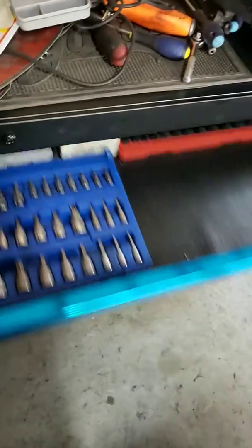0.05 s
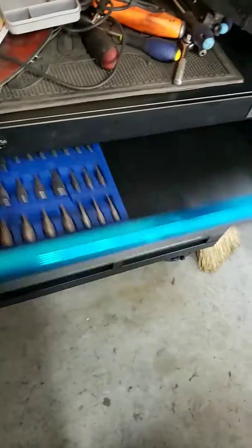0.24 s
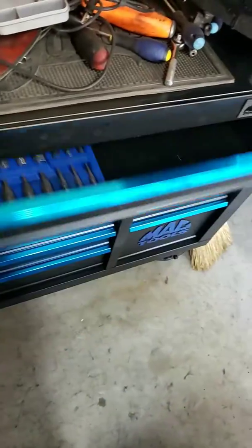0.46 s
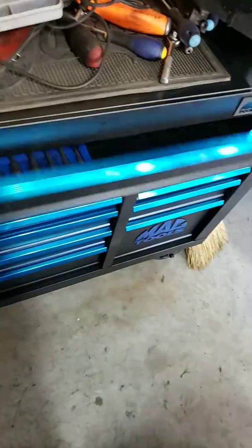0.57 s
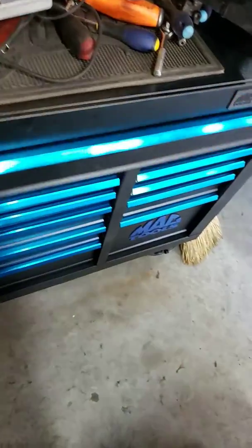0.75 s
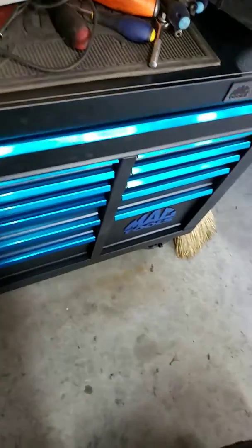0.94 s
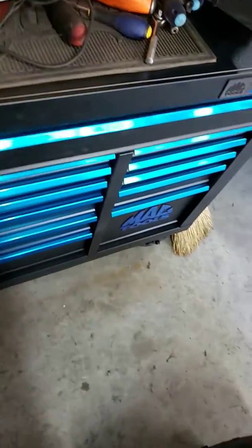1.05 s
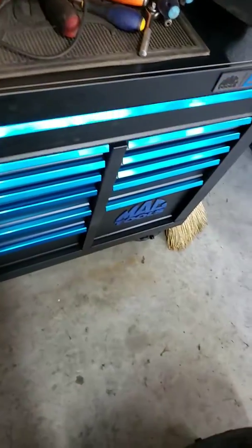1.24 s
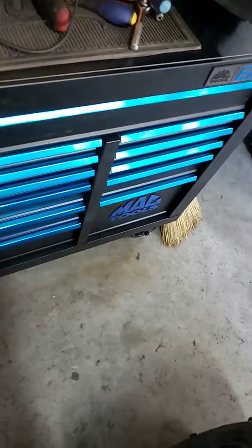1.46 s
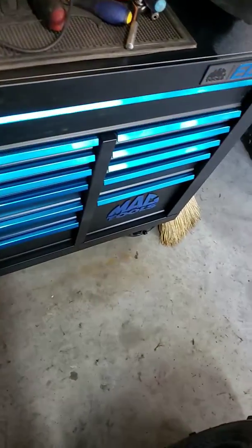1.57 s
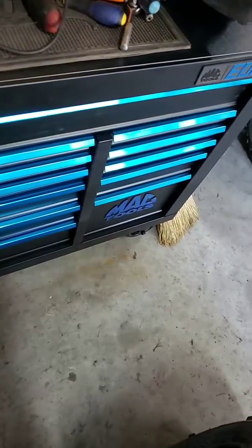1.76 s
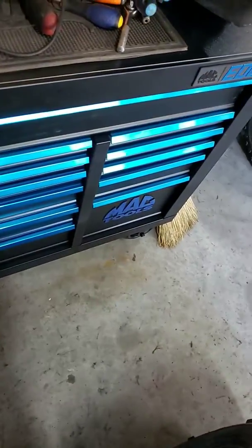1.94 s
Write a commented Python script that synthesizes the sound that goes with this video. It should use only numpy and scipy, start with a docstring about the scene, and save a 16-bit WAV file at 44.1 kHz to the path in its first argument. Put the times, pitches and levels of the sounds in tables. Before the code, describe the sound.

In a quiet workshop, a metal tool drawer slides closed with a soft rolling sound and a few clicks. A thump and hollow latch knock follow, while small steel bits clack and ring thinly over low room rumble.

```python
"""A steel tool chest drawer is pushed shut in a quiet workshop, heard on a stereo pair of microphones.
Its ball slides roll and knock twice; the soft-close catch takes it with a rattle and a thump, a side
panel hums briefly, the latch knocks and the damper draws it home with a whirr. Loose bits in the drawer
clack together and ring very high. A distant tap and a faint tick follow over the room's rumble."""
import sys
import numpy as np
from scipy import signal
from scipy.fft import rfft, irfft, next_fast_len
from scipy.io import wavfile

SR = 44100
rng = np.random.default_rng(int(sys.argv[2]) if len(sys.argv) > 2 else 0)


def wrap_up_sound(samples):
    """Save the sound to the file named by the first command line argument, as 16-bit audio."""
    columns = np.atleast_2d(samples).T
    # keep every value between -1 and 1, then stretch to whole-number steps
    tamed = np.clip(columns, -1, 1)
    steps = np.round(tamed * 32767).astype(np.int16)
    wavfile.write(sys.argv[1], SR, steps)


N = 88420
TIME = np.arange(N) / SR
HIT_TIME = TIME[:SR // 2]
CUTOFF_HZ = 15800

# The drawer's travel. Each row: time in seconds, rumble level in dB, hiss level in dB.
ROLL_LEVELS = [(0, -61.5, -68), (.11, -57, -64.5), (.28, -54.5, -60.5), (.39, -54.5, -70),
               (0.451, -54, -63), (.6, -57, -60.5), (0.678, -40.5, -54), (.82, -57, -62.5),
               (.92, -56.5, -56.5), (1.1, -59.5, -62.5), (1.23, -63.5, -70.5), (1.32, -70.5, -83.5),
               (1.42, -69, -80), (1.501, -79, -95), (1.8, -82.5, -99), (2, -71.5, -77.5)]
# Spectra of the slides. Each row: frequency in Hz, level in dB.
ROLL_RUMBLE = [(40, -14.5), (62, 5.5), (100, -2), (150, 0), (220, -6.5), (400, -3.5), (700, -8),
               (1100, -13.5), (2200, -42.5)]
ROLL_HISS = [(500, 2), (1000, -41), (1600, 0.5), (3000, 0), (4500, -1.5), (7000, -4.5), (8600, -22),
             (12000, -23), (15500, -15)]

def slides(clicks_per_s=230, grain_s=0.0048, grain_share=0.31):
    """Balls roll in their tracks: a rumble, and a hiss made grainy by their tiny clicks."""
    s, rumble_db, hiss_db = np.transpose(ROLL_LEVELS)
    clicks = (rng.random(N) < clicks_per_s / SR) * rng.exponential(1, N)
    grains = signal.lfilter([1], [1, -np.exp(-1 / (grain_s * SR))], clicks + 1e-18)
    flicker = np.sqrt(1 - grain_share + grain_share * grains / grains.mean())
    rumble = from_db(np.interp(TIME, s, rumble_db)) * noise(ROLL_RUMBLE)
    hiss = from_db(np.interp(TIME, s, hiss_db)) * flicker * noise(ROLL_HISS)
    return rumble + hiss

# Blows on the drawer. Each row: start in seconds, level in dB, tilt in dB per octave,
# t60 in seconds, favoured frequency in Hz, relative panel ring in dB.
KNOCKS = [(0.1193, -35.5, 2, 0.11, 715, -9), (.125, -34.5, -2, 0.079, 3260, -7),
          (.141, -46, 1.5, 0.29, 670, -20), (0.2067, -32.5, -0.2, 0.079, 1860, -13),
          (.221, -43.5, -0.5, 0.21, 706, -5), (.504, -49.5, 3, 0.18, 4900, -18),
          (0.625, -41.5, 0.6, 0.087, 1600, -7), (.638, -43, -1, 0.23, 1210, -19),
          (0.652, -45.5, 4.5, 0.072, 298, -5), (.659, -39, 4, 0.11, 1830, -10),
          (.691, -40.5, 4, 0.085, 400, -11), (.718, -45.5, 0, .062, 3530, -26),
          (.751, -36.5, 5, 0.044, 2980, -22.5), (0.854, -37.5, -0.5, 0.051, 2460, -20),
          (1.012, -44, -1.1, 0.11, 620, -4)]
# Struck steel. Each row: frequency in Hz, level in dB.
STEEL_SPECTRUM = [(60, 0), (200, -4.5), (400, -1), (720, 1), (950, -2), (1250, -2), (1650, -3),
                  (2100, -4.5), (2700, -7), (3300, -6.5), (4800, -13.5), (6700, -16.5), (8600, -30.5),
                  (12000, -22.5), (15500, -33)]
# The drawer's panel. Each row: frequency in Hz, level in dB, t60 in seconds.
PANEL_MODES = [(428, -5, .15), (573, -9, .14), (662, -3, .13), (712, 0, .17), (902, -4, .18),
               (1187, -2, .15), (1353, -8, .15), (1600, -7, .22), (1800, -5, .15), (2060, -4, .15),
               (2525, -7, .15), (3311, -6, .17), (3950, -15, .25)]

def knocks(out):
    """Steel knocks set the panel ringing; each place struck favours one band."""
    for s, db, tilt_db, t60, centre_hz, ring_db in KNOCKS:
        panel = from_db(ring_db - 4) * ring(favoured(PANEL_MODES, centre_hz), 0.001, scatter_db=3.5)
        spectrum = favoured(STEEL_SPECTRUM, centre_hz)
        steel = burst(spectrum, t60, tail_db=-14.5, attack_s=0.00052, tilt_db=tilt_db)
        add(out, s, from_db(db) * (steel + panel))

# Snaps in the tracks. Each row: start in seconds, level in dB.
SNAPS = [(0.088, -48), (.117, -39), (0.4285, -28.5)]
# Their spectrum. Each row: frequency in Hz, level in dB.
SNAP_SPECTRUM = [(1000, 6), (7000, -13), (9000, -2.5), (11500, -3), (13000, 11), (15500, 4)]

def snaps(out):
    """The slides give sharp, high snaps."""
    for s, db in SNAPS:
        add(out, s, from_db(db) * burst(SNAP_SPECTRUM, t60=0.0038, tail_db=-31.5, attack_s=0.00034))

# Thumps of the catch. Each row: start in seconds, level in dB, tilt in dB per octave.
THUMPS = [(.648, -35.5, 5), (0.662, -44.5, -5.5), (.683, -42, -8.5), (0.826, -49.5, -6)]
# The cabinet's body. Each row: frequency in Hz, level in dB, t60 in seconds.
CABINET_MODES = [(61.4, 0, 0.13), (149.7, 1.5, 0.13), (175.5, -8.5, 0.27), (246, -8.5, 0.16),
                 (310.5, -9, 0.32)]

def catch(out):
    """The catch loads the cabinet, which thumps in its low modes."""
    for s, db, tilt_db in THUMPS:
        modes = [(hz, mode_db + tilt_db * np.log2(hz / 150), t60) for hz, mode_db, t60 in CABINET_MODES]
        add(out, s, from_db(db) * ring(modes, attack_s=0.0019, scatter_db=2.5))

# Knocks of the latch. Each row: start in seconds, level in dB.
LATCH_HITS = [(0.8562, -33), (0.8653, -29)]
# Its modes. Each row: frequency in Hz, level in dB, t60 in seconds.
LATCH_MODES = [(388, -7, .05), (438, -1.5, .064), (684, -9, .09)]

def latch_knock(out):
    """The latch engages with a hollow double knock."""
    for s, db in LATCH_HITS:
        add(out, s, from_db(db) * ring(LATCH_MODES, attack_s=0.0011, scatter_db=1))

# Hum at the cabinet's side. Each row: time in seconds, level in dB.
HUM_LEVEL = [(.72, -88), (.738, -42), (.78, -48), (.805, -68), (.835, -47), (.87, -68), (.905, -62),
             (1.05, -110)]

def panel_hum(pitch_hz=149, waver_hz=5, wavers_per_s=25):
    """A side panel hums briefly after the catch, at a slightly unsteady pitch."""
    knots = np.arange(0, TIME[-1] + 1, 1 / wavers_per_s)
    hz = pitch_hz + waver_hz * np.interp(TIME, knots, rng.standard_normal(len(knots)))
    return sides(pitch_hz) * level(HUM_LEVEL) * np.sin(2 * np.pi * np.cumsum(hz) / SR)

# The damper's pull. Each row: time in seconds, level in dB.
WHIRR_LEVEL = [(.85, -65), (1.05, -57.5), (1.22, -62.5), (1.32, -73.5), (1.43, -81.5), (1.5, -94.5)]
# Its spectrum. Each row: frequency in Hz, level in dB.
WHIRR_SPECTRUM = [(700, -19.5), (1100, -7.5), (1450, 4.5), (1560, -6), (1700, 3.5), (1900, -10.5),
                  (2300, -3.5), (2950, -1), (3500, -25.5), (6000, -15.5), (8000, -46)]

def damper_whirr():
    """A faint whirr swells as the damper draws the drawer home."""
    return level(WHIRR_LEVEL) * noise(WHIRR_SPECTRUM)

# Inside the drawer. Each row: start in seconds, level in dB, favoured frequency in Hz, splash in dB.
CLACKS = [(.638, -44.5, 5070, -49), (.691, -39.5, 6400, -35), (0.7495, -42.5, 5300, -39),
          (.922, -46, 4000, -47), (0.932, -43, 5800, -41), (0.9418, -39, 4460, -40),
          (.956, -37, 4700, -44.5), (0.9637, -49.5, 4340, -70), (0.987, -39, 6340, -69),
          (1.0165, -40.5, 6000, -75), (1.108, -53.5, 5500, -82)]
# Spectra of a clack and its very high splash. Each row: frequency in Hz, level in dB.
CLACK_SPECTRUM = [(1000, -25), (2400, -15), (3000, -1), (3400, -16), (3900, 1), (4400, -6.5), (4820, 0),
                  (5400, -6), (6000, -3), (7200, -7), (8400, -32), (11000, -19), (15500, -29)]
SPLASH_SPECTRUM = [(3000, -20), (8400, -24), (11000, -9.5), (13500, 12), (15500, -18)]
# The tray under the bits. Each row: frequency in Hz, level in dB, t60 in seconds.
TRAY_MODES = [(3020, -28, 0.16), (3885, -13.5, 0.16), (4790, -3, 0.086), (5900, 2.5, 0.034),
              (7600, -7, 0.06)]

def bit_clacks(out, t60=0.04, tail_db=-19.5, attack_s=0.00058):
    """Loose steel bits strike each other and set their tray ringing."""
    for s, db, centre_hz, splash_db in CLACKS:
        tray = from_db(-9) * ring(favoured(TRAY_MODES, centre_hz), attack_s, scatter_db=4)
        clack = burst(favoured(CLACK_SPECTRUM, centre_hz), t60, tail_db, attack_s)
        add(out, s, from_db(db) * (clack + tray))
        add(out, s, from_db(splash_db) * burst(SPLASH_SPECTRUM, t60, tail_db, attack_s))

# The bits' notes. Each row: start in seconds, pitch in Hz, level in dB, t60 in seconds,
# beat rate in Hz, relative twin level in dB, delay of the first swell in seconds.
PINGS = [(.66, 9744, -61, .65, 9, -8, 0), (.691, 12900, -43.5, .33, 3, -9, 0),
         (.752, 10337, -63, .8, 2, -14, 0), (.921, 12795, -41.5, .44, 1, -10, 0),
         (.928, 13797, -46.5, .62, 5.5, -1.5, .048), (.945, 15192, -41.5, .43, 7.8, -4, .006)]

def bit_pings(out):
    """Each bit rings with its own note, beating against a close twin."""
    for s, hz, db, t60, beat_hz, twin_db, swell_s in PINGS:
        beating = abs(1 + from_db(twin_db) * np.exp(2j * np.pi * beat_hz * (HIT_TIME - swell_s)))
        add(out, s, beating * ring([(hz, db, t60)], attack_s=0.004, scatter_db=0.5))

# Spectra of two small sounds in the room. Each row: frequency in Hz, level in dB.
FAR_TAP_SPECTRUM = [(400, -16), (1300, -17), (1900, 3.5), (2600, 3), (3800, -16.5), (6000, -5.5),
                    (9000, -31), (15000, -17)]
TICK_SPECTRUM = [(1000, -12), (2300, -39), (3030, 2.5), (3550, -43), (4140, 4), (5200, -11.5), (6230, 15.5),
                 (8000, -12), (11200, -9), (15500, -22)]

def tap_and_tick(out):
    """One tap far from the microphones, then a dry tick."""
    tap = burst(FAR_TAP_SPECTRUM, t60=0.26, tail_db=-23.5, attack_s=0.00079)
    tick = burst(TICK_SPECTRUM, t60=0.0063, tail_db=-31.5, attack_s=0.00032)
    add(out, 1.584, from_db(-67.5) * tap)
    add(out, 1.952, from_db(-39) * tick)

# Spectra of the workshop's background. Each row: frequency in Hz, level in dB.
ROOM_SPECTRUM = [(22, -8), (42, 4), (75, 4), (115, -3.5), (160, -15.5), (400, -23), (600, -36),
                 (2000, -40.5), (5000, -44.5), (6000, -37.5), (8000, -55), (12000, -41)]
RUSTLE_SPECTRUM = [(3000, -10.5), (6000, 3), (7200, 2), (8600, -12.5), (12000, -2), (15500, -2)]
LATE_HISS_SPECTRUM = [(2000, -19), (5000, -22), (6000, -3), (7000, -10), (8300, -21), (15000, -14)]
# How rustle and hiss come and go. Each row: time in seconds, level in dB.
RUSTLE_LEVEL = [(0, -64), (.15, -61.5), (.38, -71.5), (.5, -61.5), (.65, -67), (.85, -78), (1.3, -100)]
LATE_HISS_LEVEL = [(1.81, -105), (1.83, -81.5), (1.88, -88), (1.91, -78), (2, -77)]

def room_tone():
    """The workshop rumbles steadily; a high rustle fades and a faint hiss rises at the end."""
    rumble = from_db(-61.5) * noise(ROOM_SPECTRUM)
    rustle = level(RUSTLE_LEVEL) * noise(RUSTLE_SPECTRUM)
    hiss = level(LATE_HISS_LEVEL) * noise(LATE_HISS_SPECTRUM)
    return rumble + rustle + hiss

# Balance at the microphones. Each row: frequency in Hz, left minus right in dB.
MIC_BALANCE = [(120, 2), (300, -1), (600, -1), (1000, 3), (2000, 3.8), (5000, 5.3), (9000, 2),
               (13000, -1.5)]

def sides(hz):
    """Left and right gains at these frequencies."""
    return from_db(at_hz(MIC_BALANCE, hz) * np.array([[.5], [-.5]]))

# Likeness of the two microphones. Each row: frequency in Hz, correlation from 0 to 1.
MIC_LIKENESS = [(100, .95), (350, .92), (650, .4), (1300, .03), (15000, .05)]

def likeness(hz):
    """The two sides agree in the bass and hardly at all in the treble."""
    return at_hz(MIC_LIKENESS, hz)

def noise(spectrum, tilt_db=0, size=N):
    """Coloured stereo noise of rms 1, tilted by tilt_db per octave."""
    length = next_fast_len(size, True)
    hz = np.maximum(np.arange(length // 2 + 1) * SR / length, 1)
    mid, side = rfft(rng.standard_normal((2, length)))
    pair = np.sqrt(1 + likeness(hz)) * mid + np.sqrt(1 - likeness(hz)) * side * [[1], [-1]]
    colour = from_db(at_hz(spectrum, hz) + tilt_db * np.log2(hz)) * (hz > 20) * (hz < CUTOFF_HZ)
    x = irfft(pair * colour * sides(hz), length)[:, :size]
    return x / np.sqrt(np.mean(x ** 2))

def burst(spectrum, t60, tail_db, attack_s, tilt_db=0, treble_hz=3030):
    """Countless close modes struck at once: a quick decay, then a tail that dies sooner in the treble."""
    x = noise(spectrum, tilt_db, len(HIT_TIME))
    pole = np.exp(-2 * np.pi * treble_hz / SR)
    low = signal.lfilter([1 - pole], [1, -pole], x)
    tail = low * decay(t60=0.58) + (x - low) * decay(t60=0.24)
    return (x * decay(t60) + from_db(tail_db) * tail) * (1 - np.exp(-HIT_TIME / attack_s))

def ring(modes, attack_s, scatter_db):
    """Decaying sines, new in strength at every blow; high modes reach the microphones out of step."""
    out = 0
    for hz, db, t60 in modes:
        phase = np.arccos(likeness(hz)) * np.array([[.5], [-.5]])
        gain = sides(hz) * from_db(db + scatter_db * rng.normal())
        out = out + gain * decay(t60) * np.sin(2 * np.pi * hz * HIT_TIME + phase)
    return out * (1 - np.exp(-HIT_TIME / attack_s))

def favoured(table, centre_hz, lift_db=5.5, octaves=0.54):
    """A spectrum or mode table with one band lifted."""
    return [(hz, db + lift_db * np.exp(-(np.log2(hz / centre_hz) / octaves) ** 2), *rest)
            for hz, db, *rest in table]

def decay(t60):
    """A fall of 60 dB every t60 seconds."""
    return from_db(-60 * HIT_TIME / t60)

def from_db(db):
    """Decibels to gain."""
    return 10 ** (np.asarray(db) / 20)

def level(curve):
    """Gain over time from rows of seconds and dB."""
    return from_db(np.interp(TIME, *np.transpose(curve)))

def at_hz(points, hz):
    """Read a table on a log-frequency axis."""
    f, value = np.transpose(points)
    return np.interp(np.log(hz), np.log(f), value)

def add(out, s, sound):
    """Mix a sound in at s seconds."""
    start = int(s * SR)
    out[:, start:start + sound.shape[1]] += sound[:, :N - start]

def scene():
    """The drawer closes in the workshop."""
    out = slides() + damper_whirr()
    knocks(out)
    snaps(out)
    catch(out)
    latch_knock(out)
    out += panel_hum()
    bit_clacks(out)
    bit_pings(out)
    out += room_tone()
    tap_and_tick(out)
    return out

def record(dry):
    """A steep low-pass cuts the very top from both microphones."""
    return signal.sosfilt(signal.ellip(10, .1, 80, CUTOFF_HZ, fs=SR, output="sos"), dry)

dry = scene()
out = record(dry)
wrap_up_sound(out)
```